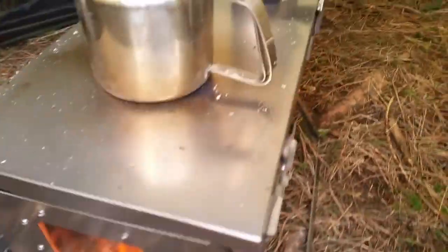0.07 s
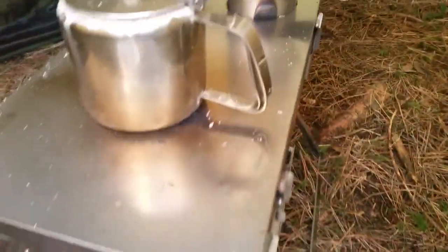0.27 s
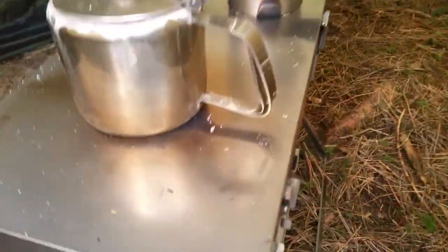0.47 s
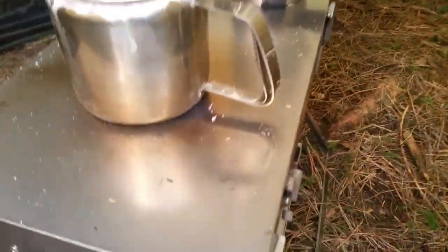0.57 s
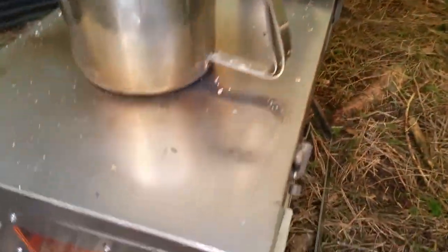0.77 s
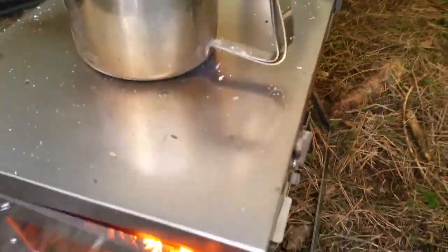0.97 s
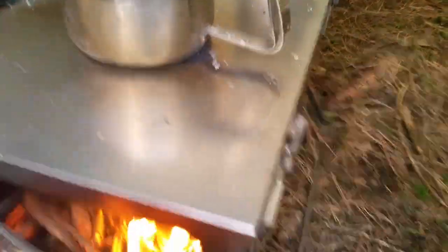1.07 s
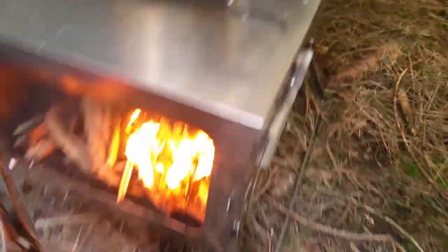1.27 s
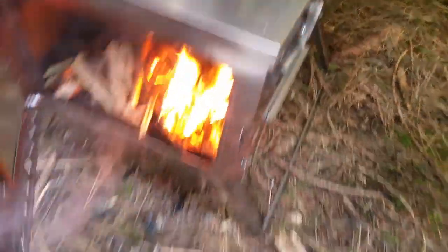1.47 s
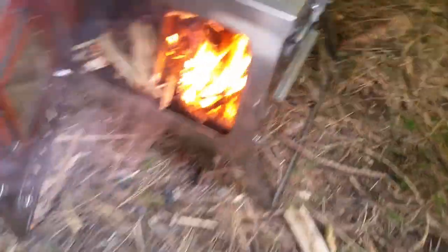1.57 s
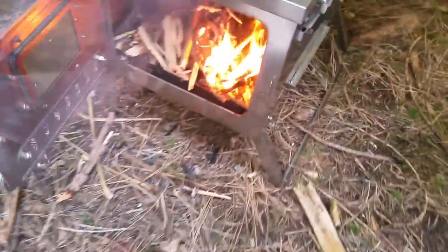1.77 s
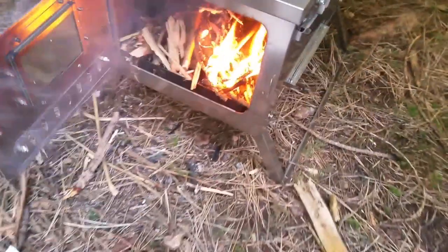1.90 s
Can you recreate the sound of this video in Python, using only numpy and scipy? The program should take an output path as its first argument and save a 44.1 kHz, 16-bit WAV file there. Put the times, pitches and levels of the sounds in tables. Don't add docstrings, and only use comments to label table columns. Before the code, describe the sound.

Dry kindling crackles and snaps sharply in a small metal stove, over faint sizzle and low flame roar

```python
import sys
import numpy as np
from scipy import signal
from scipy.io import wavfile
from scipy.ndimage import uniform_filter1d

SR = 44100
rng = np.random.default_rng(int(sys.argv[2]) if len(sys.argv) > 2 else 0)


def store_wav(level_fs):
    pcm = np.round(np.clip(np.atleast_2d(level_fs), -1, 1) * 32767)
    wavfile.write(sys.argv[1], SR, pcm.T.astype(np.int16))


def volts(x):
    e = np.asarray(x, float) / 20
    return 10 ** e


N = 88288


def evened(x):
    return x / np.sqrt(np.mean(x ** 2) + 1e-20)


def read(points, hz):
    f, value = np.transpose(points)
    return np.interp(np.log(hz + 1), np.log(f + 1), value)


def add(mix, start_s, sound):
    part = mix[..., round(start_s * SR):][..., :sound.shape[-1]]
    part += sound[..., :part.shape[-1]]


def drift(points):
    return np.interp(np.arange(N) / SR, *np.transpose(points))


def band(x, lo_hz, hi_hz):
    return signal.sosfilt(signal.butter(2, [lo_hz, hi_hz], "bandpass", fs=SR, output="sos"), x)


def causal(points):
    gain = np.log(volts(read(points, abs(np.fft.fftfreq(4096, 1 / SR)))))
    return np.fft.ifft(np.exp(gain - 1j * signal.hilbert(gain).imag)).real[:1024]


def field(shape):
    # f/Hz, left-right likeness (0 to 1)
    likeness = [(30, 0.54), (120, 0.91), (400, 0.85), (900, 0.75), (3000, 0.13)]
    same = np.clip(read(likeness, np.fft.rfftfreq(2048, 1 / SR)), 0, 1)[:, None]
    a, b, c, d = rng.standard_normal((4, len(shape), N // 512 + 5))
    left = a + 1j * b
    right = same * left + np.sqrt(1 - same ** 2) * (c + 1j * d)
    z = np.array([left, right]) * shape[:, None]
    return evened(signal.istft(z, nperseg=2048, noverlap=1536)[1][:, :N])


def wind():
    # t/s, level/dB
    gusts = [
        (0, -61.5),
        (.5, -60),
        (1.3, -58.5),
        (1.7, -54.5),
        (1.92, -57),
    ]
    hz, gust_hz = np.fft.rfftfreq(2048, 1 / SR), 36
    return field(1 / (1 + (hz / gust_hz) ** 2)) * volts(4.5 + drift(gusts))


def flame_roar():
    # f/Hz, level/dB
    flame_colour = [(11, -38), (18, -6), (109, -3), (186, -17), (220, -15), (508, -20), (3000, -65),
                    (3900, -66), (6600, -120)]
    # f/Hz, width/Hz, boost/dB
    draught = [(106.6, 10, 8.5), (172, 36, 11.5)]
    hz = np.fft.rfftfreq(2048, 1 / SR)
    shape_db = read(flame_colour, hz)
    for f, width, boost_db in draught:
        shape_db = shape_db + boost_db / (1 + (2 * (hz - f) / width) ** 2)
    return volts(-57) * field(volts(shape_db))


def shifting():
    # f/Hz, level/dB
    box_colour = [(90, -29), (160, 3), (250, -2), (400, -8), (750, -8.5), (1200, -21.5), (2200, -15.5),
                  (3000, -65)]
    # t/s, level/dB
    slides = [
        (.54, -82),
        (.58, -58),
        (.72, -57),
        (.9, -58.5),
        (.98, -51),
        (1.18, -55.5),
        (1.3, -59.5),
        (1.501, -60.5),
        (1.85, -74),
        (1.96, -57),
    ]
    x = field(volts(read(box_colour, np.fft.rfftfreq(2048, 1 / SR))))
    lumps = evened(uniform_filter1d(rng.standard_normal(N), 900))
    return x * volts(drift(slides) + 2.75 * lumps)


def thump(peak_db, hz, t60):
    rise_s, knock_hz, knock_t60 = 0.0018, 520, 0.13
    t = np.arange(8000) / SR
    wobble = evened(uniform_filter1d(rng.standard_normal(8000), 300))
    turns = np.cumsum(hz * (1 + 0.06 * wobble)) / SR
    boom = np.sin(2 * np.pi * turns) * volts(-60 * t / max(t60, .02))
    knock = evened(band(rng.standard_normal(8000), .5 * knock_hz, 1.45 * knock_hz))
    knock = knock * volts(-10.5 - 60 * t / knock_t60)
    side_db = np.array([[.4], [-.4]])
    return (1 - np.exp(-t / rise_s)) * (boom + knock) * volts(peak_db - 7 + side_db)


def settling():
    # t/s, peak level/dB, pitch f/Hz, time to fade by 60 dB t60/s
    thumps = [(0.576, -37, 282.5, 0.11), (0.619, -51, 230, 0.17), (0.767, -33.5, 184.7, 0.18),
              (0.972, -32.5, 177.5, 0.23), (1.062, -37.5, 188.7, 0.17), (1.11, -40.5, 151.4, 0.45),
              (1.153, -36, 157.4, 0.22), (1.177, -37, 239, 0.36), (1.24, -44, 250, 0.61),
              (1.374, -37.5, 170.7, 0.25), (1.493, -34.5, 167, 0.2), (1.941, -48, 174, 0.072),
              (1.951, -28.5, 275, 0.14), (1.98, -35, 190, 0.095), (.97, -37.5, 702, 0.11),
              (1.024, -46, 520, .12), (1.05, -42, 940, 0.12), (1.084, -45, 164, 0.24),
              (1.165, -45, 886, 0.17), (1.535, -45, 713, 0.26), (1.94, -42, 883, 0.11),
              (1.945, -40.5, 520, 0.16), (1.981, -34, 822, .08)]
    x = np.zeros((2, N))
    for start_s, *settings in thumps:
        add(x, start_s, thump(*settings))
    return x


def ring(peak_db, hz, t60):
    t = np.arange(5000) / SR
    wobble = evened(uniform_filter1d(rng.standard_normal((2, 5000)), size=120, axis=1))
    fade_db = 3.66 * wobble[::-1] - 60 * t / max(t60, .01)
    tone = np.sin(2 * np.pi * hz * t + 1.6 * wobble) * volts(fade_db)
    return tone * np.minimum(t / 0.00044, 1) * volts(peak_db)


def ringing():
    # t/s, peak level/dB, pitch f/Hz, time to fade by 60 dB t60/s
    rings = [(0.5782, -44.5, 3750, 0.058), (.645, -46, 7300, 0.033), (.762, -37, 3515, 0.09),
             (.763, -40.5, 2630, 0.039), (.928, -35.5, 3950, 0.067), (1.076, -39.5, 3900, 0.063),
             (1.515, -39.5, 3320, 0.17), (1.162, -27, 6000, 0.062), (1.177, -38, 5620, 0.093),
             (1.194, -23, 5582, 0.075), (1.194, -28.5, 4220, 0.072), (1.369, -50.5, 1864, 0.28),
             (1.506, -31, 7500, 0.057), (1.51, -47, 1545, 0.062), (1.529, -31, 5240, 0.05),
             (1.725, -45, 7540, 0.3), (1.759, -39.5, 7500, 0.16), (1.83, -46.5, 7140, 0.12),
             (1.983, -38, 2233, 0.073)]
    x = np.zeros((2, N))
    for start_s, *settings in rings:
        add(x, start_s, ring(*settings))
    return x


def cracks(size, per_s, spread_db, hiss):
    hit = rng.random(size) < per_s / SR
    big = rng.exponential(1, size)
    air = rng.standard_normal(size)
    breaks = hit * np.sign(air) * volts(spread_db * np.minimum(big, 4))
    return evened(evened(breaks) + hiss * air)


def ports(x):
    lag_s, echo_db, echo_t60 = .00008, 1.5, 0.012
    t = np.arange(600) / SR
    sparse = rng.random((2, len(t))) < .08
    taps = rng.standard_normal((2, len(t))) * sparse * volts(-60 * t / echo_t60)
    taps = band(taps, 774, 21900)
    taps *= volts(echo_db) / np.linalg.norm(taps, axis=1, keepdims=True)
    taps[[0, 1], [0, round(lag_s * SR)]] += 1
    return signal.oaconvolve(np.broadcast_to(x, (2, x.shape[-1])), taps, axes=1)


def port_colour(x):
    # f/Hz, level/dB
    left_port = [(300, -10), (1600, -16), (3500, -10.5), (5000, -3), (5700, 2), (6400, -5.5), (7500, -12),
                 (10500, -21.5), (14000, -19.5)]
    # f/Hz, level/dB
    right_port = [(300, -15.5), (1600, -11), (2600, -20.5), (3300, -10), (6000, -4.5), (6700, -4),
                  (7300, 1.5), (10300, -18), (14000, -16.5)]
    responses = np.array([causal(left_port), causal(right_port)]) * volts(6.5)
    return signal.oaconvolve(x, responses, axes=1)[:, :N]


def sizzle():
    # t/s, level/dB, dullness (boost of the lower part)/dB
    fire = [(0, -52.5, 4), (.3, -55.5, 4.5), (.34, -61, 4.5), (0.561, -60, 1.5), (0.641, -59.5, -12),
            (.69, -52, 0.5), (.8, -49, -0.5), (.9, -54, -1), (.95, -50, -1), (1.08, -52.5, 9),
            (1.14, -56, -4), (1.27, -62.5, 7.5), (1.403, -54.5, 7), (1.484, -44.5, -4), (1.65, -55, 7),
            (1.748, -51, -2.5), (1.871, -61, 4.5), (2, -54.5, 5)]
    s, level_db, dull_db = np.transpose(fire)
    t = np.arange(N) / SR
    near = ports(cracks(N, per_s=3000, spread_db=3.5, hiss=1))[:, :N]
    x = evened(near) + 0.75 * band(rng.standard_normal((2, N)), 840, 20300)
    z = signal.stft(x, nperseg=256)[2]
    patches = uniform_filter1d(rng.standard_normal(z.shape[:0:-1]).T, 6, 0)
    patches = evened(uniform_filter1d(patches, 8, 1))
    x = evened(signal.istft(z * volts(1.73 * patches), nperseg=256)[1][:, :N])
    x = x + (volts(np.interp(t, s, dull_db)) - 1) * band(x, 140, 2620)
    return x * volts(9.5 + np.interp(t, s, level_db))


def snap(start_s, peak_db, length_s, bright_db, body_db, ring_hz=None):
    # t/s, left-right difference/dB
    turn_of_phone = [
        (.5, 4.5),
        (.75, -1),
        (1.2, 4),
        (1.5, -3),
        (2, -4),
    ]
    rise_s, release_t60, tail_t60, sharp_s = .0002, .016, .12, .0035
    t = np.arange(3600) / SR
    length_s = max(length_s, .0005)
    x = cracks(len(t), per_s=4000, spread_db=3.5, hiss=0.52)
    x[8] = volts(19) * min(sharp_s / length_s, 1)
    x = x + (volts(bright_db + 20) - 1) * band(x, 7640, 21400)
    body = signal.sosfiltfilt(signal.butter(4, 4300, fs=SR, output="sos"), x)
    x = x + (volts(body_db) - 1) * body
    if ring_hz:
        x = evened(x + volts(7) * band(x, 0.942 * ring_hz, 1.056 * ring_hz))
    after = np.maximum(t - length_s, 0)
    cracking = volts(-3 * np.minimum(t / length_s, 1) - 60 * after / release_t60)
    tail = volts(-12 - 60 * t / tail_t60)
    shape = np.minimum(t / rise_s, 1) * (cracking + tail)
    side_db = np.array([[.5], [-.5]]) * np.interp(start_s, *np.transpose(turn_of_phone))
    return ports(x * shape) * volts(peak_db - 11 + side_db)


def snapping():
    # t/s, peak level/dB, cracking length/s, brightness/dB, body/dB
    snaps = [(0.5796, -29, 0.0028, -32, -7), (0.672, -27, 0.0075, -23, -9), (0.679, -40, 0.0018, -1.5, -17),
             (.683, -21.5, 0.0034, -11.5, -2), (0.697, -22.5, 0.0038, -24, -18),
             (0.705, -20.5, 0.0066, -11.5, -6), (0.716, -26, .014, -28, -19), (0.771, -16, 0.0016, -23, -8),
             (0.9294, -18.5, 0.0041, -39, -5), (1.179, -21, 0.011, -27, -7),
             (1.455, -24.5, 0.0021, -18, -10), (1.464, -30, 0.016, -9, -9),
             (1.503, -15.5, 0.0063, -16, -3.5), (1.509, -22.5, 0.0053, -6, 1),
             (1.521, -15.5, 0.0059, -13, -3), (1.5904, -23.5, 0.005, -17.5, -7.5),
             (1.979, -22, 0.021, -41, 1)]
    # t/s, peak level/dB, cracking length/s,
    # brightness/dB, body/dB
    more_snaps = [
        (.7615, -21, .006, -23, -5),
        (.9135, -24, .013, -30, -10),
        (1.161, -21, .005, -14, -16),
        (1.193, -11.5, .0028, -13, -9),
        (1.4892, -12, .007, -16, -5),
        (1.5615, -23, .0025, -15, -7),
        (1.6728, -25, .0034, -16, -12),
    ]
    # t/s, peak level/dB, ring f/Hz
    ticks = [(0.4418, -40.5, 4900), (.47, -37.5, 8200), (0.656, -43, 5800), (0.738, -29, 7560),
             (0.796, -34, 7000), (0.816, -31.5, 5870), (.839, -44, 6050), (0.865, -31, 6900),
             (0.886, -36, 6960), (.965, -32, 4960), (1.0025, -27, 5200), (1.028, -34, 6870),
             (1.06, -27, 7000), (1.077, -32, 5560), (1.085, -37, 7400), (1.349, -36.5, 8800),
             (1.678, -25.5, 6700), (1.721, -33, 7700), (1.801, -41, 7500), (.6316, -51, 5330),
             (1.013, -33, 7500), (1.037, -38, 6500), (1.29, -39, 7700), (1.3679, -37.5, 7000),
             (1.446, -36, 7300), (1.6, -31, 6900), (1.905, -43, 6050), (0.7123, -21, 6900),
             (.721, -32, 6430), (.979, -40, 5560), (1.927, -33, 6440), (1.9345, -38, 8500),
             (1.944, -33, 8350), (1.953, -23.5, 8700), (1.962, -31, 6340), (1.97, -31.5, 8400)]
    x = np.zeros((2, N))
    for table in (snaps, more_snaps):
        for row in table:
            add(x, row[0], snap(*row))
    for start_s, peak_db, ring_hz in ticks:
        add(x, start_s, snap(start_s, peak_db, length_s=.002, bright_db=-20, body_db=-9, ring_hz=ring_hz))
    return x


def scene():
    box = wind() + flame_roar() + shifting() + settling() + ringing()
    wood = sizzle() + snapping()
    return port_colour(wood) + box


def top_cut(x):
    return signal.sosfilt(signal.butter(12, 16820, fs=SR, output="sos"), x)


def record(dry):
    # f/Hz, level/dB
    roll_off = [(14900, -0.5), (15400, -15), (15800, -24), (16800, -29), (17050, -87)]
    # f/Hz, level/dB
    gate = [(1800, -108), (2800, -93), (4200, -100), (8500, -106), (10000, -93), (14500, -93), (15400, -88)]
    stop_s, fade_s = 1.9945, .002
    x = signal.oaconvolve(dry, causal(roll_off)[None], axes=1)[:, :N]
    hz, _, z = signal.stft(x, SR, nperseg=512)
    power = uniform_filter1d(abs(z) ** 2, size=7, axis=1)
    power = uniform_filter1d(power, size=3, axis=2).mean(0)
    heard = 10 * np.log10(power + 1e-20) > read(gate, hz)[:, None]
    x = signal.istft(z * heard, SR, nperseg=512)[1][:, :N]
    x = x * np.clip((stop_s + fade_s - np.arange(N) / SR) / fade_s, .03, 1)
    return top_cut(x)


dry = scene()
out = record(dry)
store_wav(out)
```